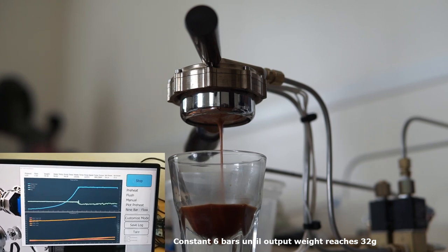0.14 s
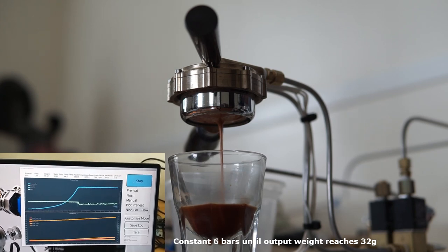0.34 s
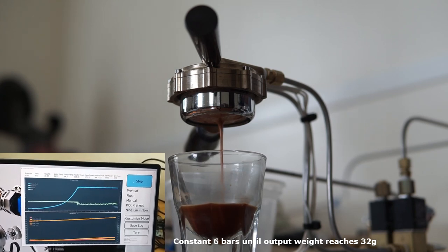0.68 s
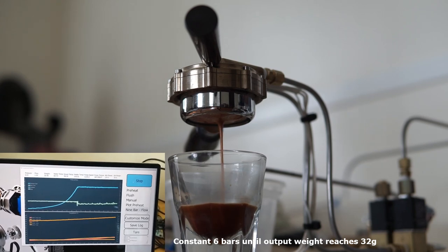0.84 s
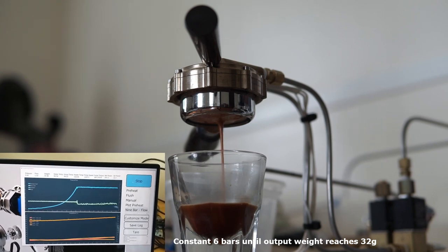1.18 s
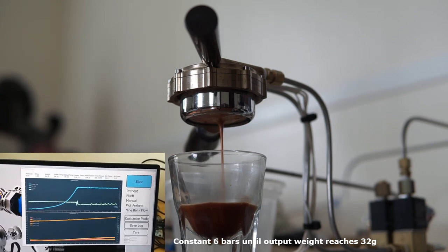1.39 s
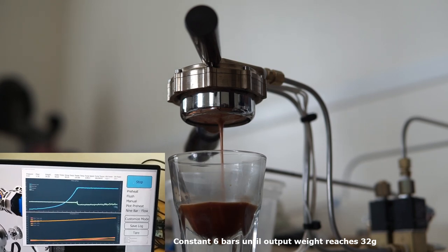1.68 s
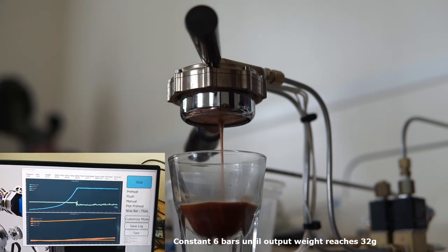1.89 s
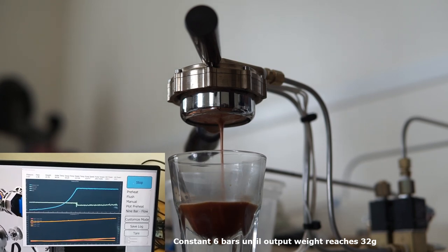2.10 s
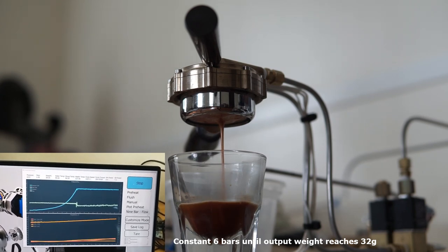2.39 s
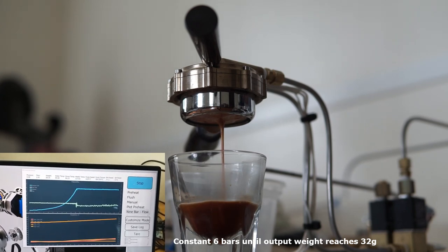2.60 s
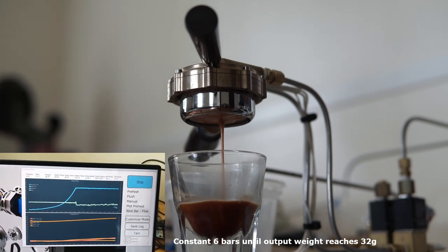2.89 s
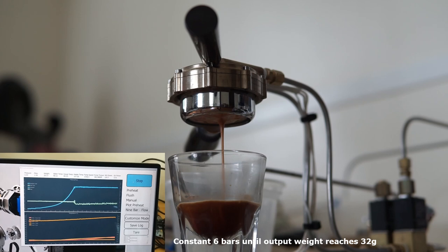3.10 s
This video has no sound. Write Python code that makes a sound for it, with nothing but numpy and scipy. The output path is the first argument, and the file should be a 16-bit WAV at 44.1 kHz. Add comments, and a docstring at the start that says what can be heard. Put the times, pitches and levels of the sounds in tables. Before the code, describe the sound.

A small gear pump whirs without a break from start to end, its low, buzzing hum topped by a metallic, ringing hiss; quiet fan and room noise sit underneath, heard close in a small indoor room.

```python
"""Small gear pump on a bench

A small gear pump whirs steadily. Its gear teeth give a low stack of tones, and their rasp, a pulsed noise,
rings the metal in many narrow resonances, with a fuzzy whistle on one. Mains hum, two fan-like tones and faint
whines are wavering sines in the mids. Shaped noise underneath is the room and fans; a random decaying tail
colours the noises."""
import sys
import numpy as np
from scipy import signal
from scipy.fft import rfft, irfft
from scipy.io import wavfile
from scipy.ndimage import uniform_filter1d

SR = 44100
rng = np.random.default_rng(int(sys.argv[2]) if len(sys.argv) > 2 else 0)


def store_pcm(level_fs):
    """Save levels as 16-bit WAV."""
    pcm = np.round(np.clip(level_fs, -1, 1) * 32767).astype(np.int16)
    wavfile.write(sys.argv[1], SR, np.atleast_2d(pcm).T)


N = 142884  # length [samples]

MESH_HZ, MESH_WANDER = 177, 0.0015  # teeth meeting per second, rms speed drift [share]
TEETH, SHAFT_WOBBLE = 9, 0.18  # teeth per turn, once-per-turn level swing [share]
HUM_HZ, HUM_WAVER_DB = 120, 2
FAN_WANDER, FAN_WAVER_DB = 0.0006, 1.5  # rms pitch drift [share], also used by the whines; rms level drift
WHINE_WAVER_DB, TONE_WAVER_HZ = 1, 8  # rms level drift of whines and whistle, its speed for all tones
WHISTLE_HZ, WHISTLE_WANDER = 10033, 0.0005  # pitch, rms pitch drift [share]
TOOTH_PULSE = 0.05  # depth of the rasp's pulsing by the teeth [share]
FLICKER_DB, FLICKER_HZ, PATCH_DB = 0.44, 45.3, 0.39  # rasp: overall flicker, its speed, patchiness
RING_DB, NARROWING_HZ = 1, 5  # common level lift and width reduction of all rings
ROOM_T60_S, ROOM_DB = 0.56, -13.5  # tail decay time, tail level against the direct sound
ECHO_SHARE, ECHO_T60_S = 0.28, 0.08  # power share of the side noise taken from the mid, smear decay time
TONE_WIDTH = 0.69  # tones spread less to the side than the noise
EDGE_HZ = 15770  # top of the band


def amp(db):
    """Decibels to a linear factor."""
    return 10 ** (np.asarray(db) / 20)


def evened(x):
    """Scale to rms 1."""
    return x / np.sqrt(np.mean(abs(x) ** 2) + 1e-20)


def read(points, hz):
    """Read a frequency table along a log-frequency axis."""
    f, value = np.transpose(points)
    return np.interp(np.log(hz + 1), np.log(f + 1), value)


def curve(points):
    """Draw a time table as straight lines over the scene."""
    s, value = np.transpose(points)
    return np.interp(np.arange(N) / SR, s, value)


def drift(hz):
    """Random drift, rms 1, that fades out above hz."""
    f = np.fft.rfftfreq(N, 1 / SR)
    lowpass = (f > 0) / (1 + (f / hz) ** 2)
    return evened(irfft(rfft(rng.standard_normal(N)) * lowpass, N))


def turning(hz, wander):
    """Running count of cycles of a pitch that drifts slowly."""
    return np.cumsum(hz * (1 + wander * drift(1.68))) / SR


def tone(turns, db, waver_db):
    """A sine from a random phase that wavers in level around db (rms)."""
    level = amp(db + waver_db * drift(TONE_WAVER_HZ))
    return level * np.sqrt(2) * np.sin(2 * np.pi * (turns + rng.random()))


def bed(hz):
    """Room and fan noise: two unrelated white noises shaped by one spectrum."""
    # soft noise floor: (frequency [Hz], density [dB per Hz])
    bed_level = [(25, -139), (60, -128), (78, -117), (95, -124), (120, -119), (200, -113), (230, -115),
                 (260, -103), (340, -103), (385, -110), (450, -100), (600, -92), (900, -89), (1000, -97),
                 (1400, -99), (2200, -110), (4000, -125)]
    return rfft(rng.standard_normal((2, N))) * amp(read(bed_level, hz))


def room():
    """Direct sound plus a decaying random tail: a fixed fine ripple in the spectrum, for two paths."""
    t = np.arange(SR // 2) / SR
    decay = amp(-60 * t / ROOM_T60_S) * (t > 0.003)  # the tail starts 3 ms after the direct sound
    tail = rfft(rng.standard_normal((2, len(t))) * decay, N)
    return evened(1 + amp(ROOM_DB) * evened(tail))


def echo_path():
    """A short smear of reflections reaching the side of the microphone."""
    t = np.arange(SR // 4) / SR
    smear = rng.standard_normal(len(t)) * amp(-60 * t / ECHO_T60_S)
    return evened(rfft(smear, N))


def mains_hum():
    """Multiples of the hum pitch, steady in pitch and wavering in level."""
    # hum partials: (multiple, level before the slow level of all tones [dB])
    hum_partials = [(4, -78), (5, -81.5), (6, -83), (7, -66.5)]
    t = np.arange(N) / SR
    return sum(tone(k * HUM_HZ * t, db, HUM_WAVER_DB) for k, db in hum_partials)


def faint_whines():
    """Faint tones, each drifting slightly in pitch and level."""
    # whines: (frequency [Hz], level before the slow level of all tones [dB])
    whine_tones = [(491.2, -81), (950.8, -75), (942, -79)]
    return sum(tone(turning(hz, FAN_WANDER), db, WHINE_WAVER_DB) for hz, db in whine_tones)


def fans():
    """Two fan-like blade tones, each with an octave that follows its drifting pitch."""
    # fans: (blade tone [Hz], level [dB], octave level [dB]), before the slow level of all tones
    blade_tones = [(660.8, -65, -71), (655, -77, -72)]
    out = np.zeros(N)
    for hz, db, octave_db in blade_tones:
        turns = turning(hz, FAN_WANDER)
        out += tone(turns, db, FAN_WAVER_DB)
        out += tone(2 * turns, octave_db, FAN_WAVER_DB)
    return out


def gear_mesh(mesh):
    """Teeth meeting give a stack of multiples that swells once per turn of the uneven shaft."""
    # mesh partials: (multiple, level before swings [dB], rms waver, its sign only flips the drift [dB])
    mesh_partials = [(1, -87, 1.5), (2, -88, 0), (3, -74.5, -1), (4, -77.5, 5), (5, -66, 2.5)]
    stack = sum(tone(k * mesh, db, waver_db) for k, db, waver_db in mesh_partials)
    return stack * (1 + SHAFT_WOBBLE * np.cos(2 * np.pi * mesh / TEETH))


def tones(mesh):
    """All steady tones under one slow level."""
    # slow level of all tones: (time [s], level [dB])
    tone_level = [(0, -1.5), (.6, -2), (1.2, 0), (2, 1), (2.7, 1), (3.24, 1)]
    return (gear_mesh(mesh) + mains_hum() + fans() + faint_whines()) * amp(curve(tone_level))


def whistle():
    """The strongest ring as a fuzzy whistle: one drifting sine that comes and goes."""
    # whistle: (time [s], level [dB])
    whistle_level = [(0.0, -70.5), (0.05, -54), (0.11, -68), (0.24, -55.5), (0.5, -66), (0.64, -52),
                     (0.76, -69), (1.21, -69), (1.34, -65), (1.6, -73), (1.94, -62.5), (3.24, -77)]
    return tone(turning(WHISTLE_HZ, WHISTLE_WANDER), curve(whistle_level), WHINE_WAVER_DB)


def rasp(mesh):
    """Two unrelated noises, pulsed by the teeth, flickering together and in time-frequency patches."""
    # rasp, only its shape counts as the result is evened: (time [s], level [dB])
    rasp_level = [(0.0, -49), (0.04, -48), (0.19, -48.5), (0.23, -48), (0.46, -49), (0.68, -47.5),
                  (0.76, -50), (0.83, -47), (1.08, -49.5), (1.42, -48), (1.82, -49), (1.99, -47.5),
                  (2.01, -50), (2.16, -48), (2.75, -49), (2.9, -48.5), (2.95, -48.5), (3.24, -49.5)]
    level = amp(curve(rasp_level) + FLICKER_DB * drift(FLICKER_HZ))
    pulse = 1 + TOOTH_PULSE * np.cos(2 * np.pi * mesh)
    noise = rng.standard_normal((2, N)) * level * pulse
    z = signal.stft(noise, nperseg=512)[2]
    patches = rng.standard_normal(z.shape[1:])
    patches = uniform_filter1d(patches, size=8, axis=0)  # across frequency
    patches = evened(uniform_filter1d(patches, size=8, axis=1))  # across time
    patchy = signal.istft(z * amp(PATCH_DB * patches), nperseg=512)[1][:, :N]
    return evened(patchy)


def rings(hz):
    """Summed response of the machine's narrow resonances over the rasp heard between them."""
    # resonances rung by the rasp, split into tables by frequency band only: (frequency [Hz], width before the
    # common reduction [Hz], peak before the common lift [dB per Hz])
    base = [(400, 24, -101), (433, 14, -98), (452, 14, -96), (790, 60, -97), (950, 40, -93),
            (1025, 24, -96), (1060, 18, -98), (1122, 55, -88), (1200, 16, -98), (1280, 40, -97)]
    rings_1500_4800 = [(1512.0, 330.0, -102.6), (1971.0, 115.0, -100.6), (2096.0, 18.0, -99.0), (2469.0, 36.0, -92.3),
                       (2685.0, 115.0, -105.9), (2972.0, 83.0, -107.1), (3184.0, 47.0, -90.1), (3513.0, 42.0, -103.7),
                       (3791.0, 54.0, -91.1), (4404.0, 23.0, -104.9), (4558.0, 101.0, -94.0), (4771.0, 44.0, -105.5)]
    rings_5000_8200 = [(5022.0, 97.0, -99.3), (5150.0, 33.0, -93.9), (5379.0, 52.0, -81.8), (5453.0, 18.0, -91.2),
                       (5583.0, 184.0, -89.2), (6341.0, 103.0, -102.4), (6539.0, 43.0, -84.6),
                       (6731.0, 18.0, -103.0), (6787.0, 24.0, -86.5), (6976.0, 18.0, -103.5),
                       (7473.0, 136.0, -98.8), (7699.0, 57.0, -102.5), (7783.0, 23.0, -94.3), (7907.0, 34.0, -84.9),
                       (8031.0, 62.0, -81.4), (8187.0, 47.0, -102.0)]
    rings_9000_12100 = [(9046.0, 103.0, -85.8), (9161.0, 37.0, -90.3), (9371.0, 128.0, -91.0), (9450.0, 44.0, -87.0),
                        (9731.0, 33.0, -84.6), (9889.0, 43.0, -85.6), (10033.0, 19.0, -75.9), (10086.0, 110.0, -81.4),
                        (10536.0, 24.0, -83.8), (10592.0, 227.0, -85.8), (11042.0, 164.0, -99.1),
                        (11161.0, 21.0, -88.6), (11227.0, 35.0, -82.6), (11426.0, 73.0, -96.3),
                        (11551.0, 55.0, -90.5), (11702.0, 250.0, -93.2), (12093.0, 33.0, -100.1)]
    rings_12300_15700 = [(12288.0, 43.0, -101.7), (12632.0, 153.0, -91.6), (12811.0, 82.0, -88.1),
                         (12920.0, 82.0, -88.6), (13237.0, 23.0, -98.8), (13427.0, 82.0, -88.5),
                         (13711.0, 65.0, -85.8), (13866.0, 75.0, -96.8), (14093.0, 177.0, -94.1),
                         (14267.0, 45.0, -90.4), (14375.0, 27.0, -96.8), (14680.0, 18.0, -98.3),
                         (14896.0, 69.0, -89.6), (14979.0, 22.0, -94.9), (15328.0, 28.0, -95.2),
                         (15727.0, 37.0, -85.7)]
    # rasp between the rings: (frequency [Hz], density [dB per Hz])
    between = [(40, -175), (300, -135), (1000, -112), (1500, -102), (4500, -104), (8500, -102.5),
               (9500, -100.5), (15800, -99.5)]
    response = amp(read(between, hz))
    for f, width_hz, db in base + rings_1500_4800 + rings_5000_8200 + rings_9000_12100 + rings_12300_15700:
        narrowed = max(width_hz - NARROWING_HZ, 8)
        response += amp(db + RING_DB) / (1 + (2 * (hz - f) / narrowed) ** 2)
    return response


def stereo(mid_noise, other_noise, steady, hz):
    """Spread mid and side spectra to left and right, the tones a quarter cycle apart in the side."""
    # stereo width before the tones' own narrowing: (frequency [Hz], side minus mid [dB])
    side_level = [(25, -5), (60, -10), (160, -18), (300, -15), (500, -15), (750, -6.5), (1200, -5),
                  (2000, -2.5), (3300, -1.5), (8700, -1.5), (9200, -12), (10800, -24.5), (14000, -17.5),
                  (15800, -18)]
    # balance: (frequency [Hz], left minus right [dB])
    balance = [(60, 0.5), (150, 1), (380, 2.5), (950, 0), (2380, -1), (5980, 0.5), (15000, 0.0)]
    pan = amp(read(balance, hz) / 2)
    side = np.sqrt(1 - ECHO_SHARE) * other_noise
    side = side + np.sqrt(ECHO_SHARE) * mid_noise * echo_path()
    side = side + 1j * TONE_WIDTH * steady
    side = side * amp(read(side_level, hz))
    mid = mid_noise + steady
    return irfft(np.array([(mid + side) * pan, (mid - side) / pan]), N)


def scene():
    """Room noise, ringing rasp and steady tones, mixed as spectra."""
    hz = np.fft.rfftfreq(N, 1 / SR)
    mesh = turning(MESH_HZ, MESH_WANDER)
    noise = bed(hz) + rfft(rasp(mesh)) * rings(hz)
    mid_noise, other_noise = noise * room() * np.sqrt(SR / 2)  # the root makes table levels per Hz
    steady = rfft(tones(mesh) + whistle())
    return stereo(mid_noise, other_noise, steady, hz)


def record(dry):
    """The band limit: a steep low-pass."""
    lowpass = signal.firwin(2047, EDGE_HZ, window=("kaiser", 9), fs=SR)
    return signal.oaconvolve(dry, lowpass[None], "same")


dry = scene()
out = record(dry)
store_pcm(out)
```